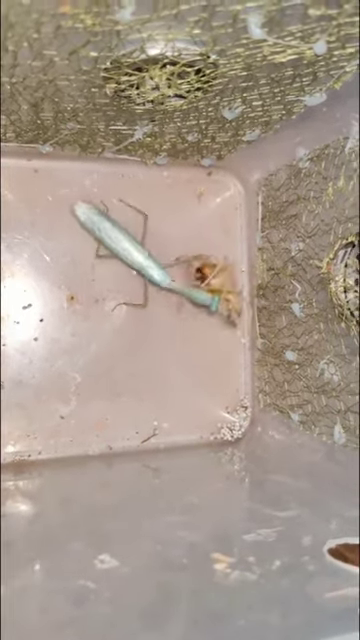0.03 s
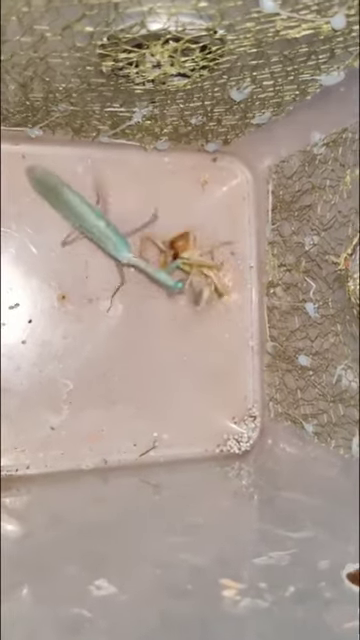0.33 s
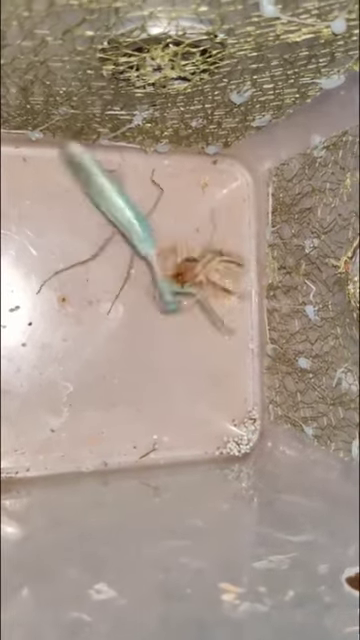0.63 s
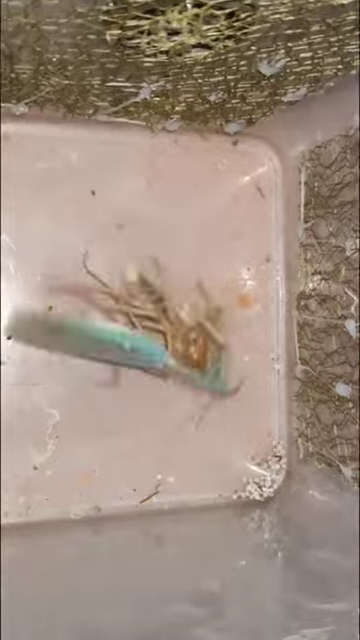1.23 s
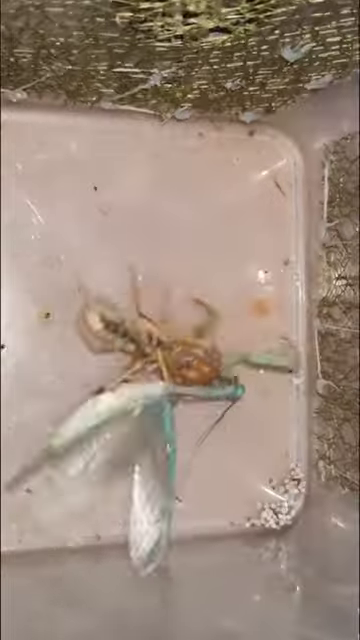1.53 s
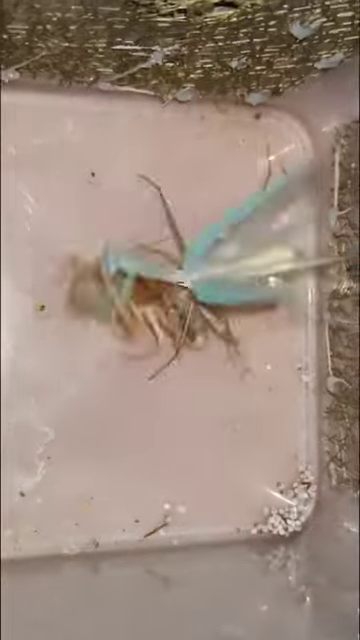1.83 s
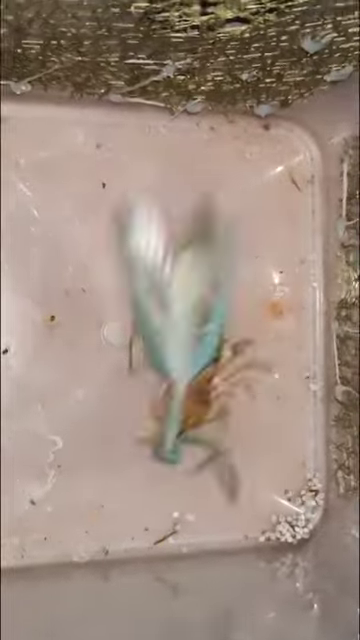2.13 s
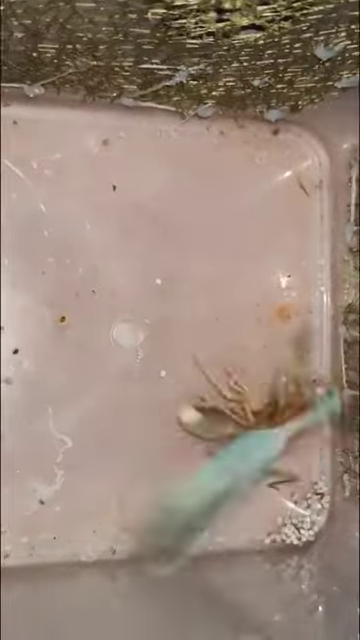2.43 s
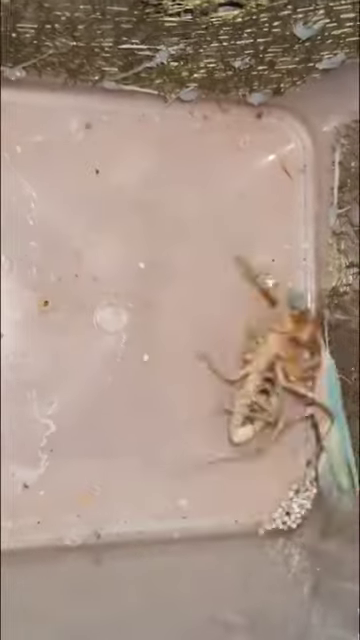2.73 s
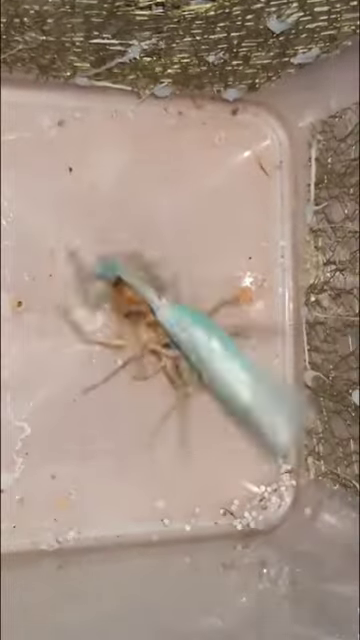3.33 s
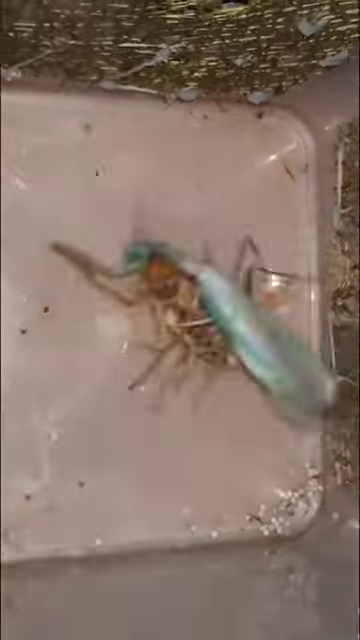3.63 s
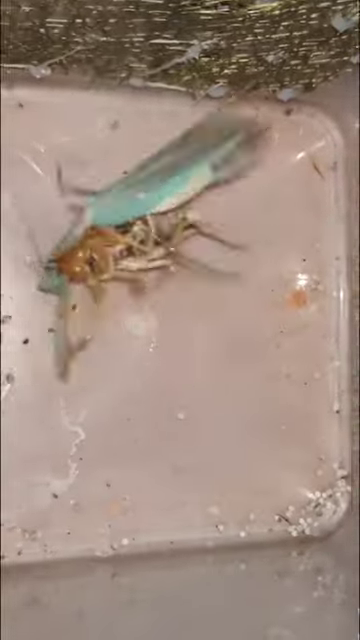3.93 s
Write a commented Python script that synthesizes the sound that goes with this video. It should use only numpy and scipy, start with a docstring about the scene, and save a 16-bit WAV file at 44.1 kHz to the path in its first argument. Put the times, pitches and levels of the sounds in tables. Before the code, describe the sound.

Insects scrabbling and knocking against a thin plastic tub, over a low hum.

```python
"""A small room, the microphone close to a thin plastic tub in which a mantis wrestles its prey.
Claws patter and scratch on the plastic, wings whisper, and dragged legs buzz as they stick and slip.
Bodies knock on the tub: the wall cracks and rings, the floor booms, hard shell ticks.
A low mains hum and soft room tone lie underneath."""
import sys
import numpy as np
from scipy import signal
from scipy.fft import rfft, irfft
from scipy.io import wavfile

SR = 44100
rng = np.random.default_rng(int(sys.argv[2]) if len(sys.argv) > 2 else 0)


def int16_out(signal):
    """Quantize to a 16-bit WAV file."""
    q = np.round(np.clip(np.atleast_2d(signal).T, -1, 1) * 32767)
    wavfile.write(sys.argv[1], SR, q.astype(np.int16))


N = 176400

# Modes of the tub's floor and wall. Each row: frequency in Hz, relative level in dB, t60 in seconds.
TUB_FLOOR = [(152.5,-7,0.051),(463.6,-4,0.03),(535,-1.5,0.024),(586.5,5.5,0.023),(649.5,-4.5,0.048),(698,-16,0.042),(1002,-7,0.04),(1138,-9.5,0.018)]
TUB_WALL = [(1470,-4,0.053),(1708,7.5,0.013),(1882,13,0.019),(1946,-0.5,0.043),(2182,3.5,0.016),(2650,-2,0.032),(2983,9,0.0082),(3282,-16.5,0.042),(4145,-14,0.038)]
RING_ATTACK_S, TICK_ATTACK_S = 0.0017, 0.0022
PATTER_PER_S, PATTER_SPREAD_DB = 350, 3
GRIT_PER_S, GRIT_SPREAD_DB = 9000, 2.6
CATCH_PER_S, BAND_FLICKER_DB = 80, 3.5
HISS_WIDTH, TOP_HZ = 0.1, 15600


def undb(db):
    """Decibels to gain."""
    return 10 ** (np.asarray(db) / 20)


def unit(x):
    """Scale to rms 1."""
    return x / np.sqrt(np.mean(x ** 2))


def burst(x):
    """Scale to the energy of 2 ms at rms 1."""
    return x / np.sqrt(np.sum(x ** 2) / (.002 * SR))


def curve(rows, column=1):
    """Gain over time from rows of seconds and dB."""
    rows = np.array(rows)
    return undb(np.interp(np.arange(N) / SR, rows[:, 0], rows[:, column]))


def colour(x, outline):
    """Minimum-phase filter that follows rows of Hz and dB."""
    size = 2 * len(x)
    hz, db = np.array(outline).T
    bin_hz = np.fft.rfftfreq(size, 1 / SR)
    gain = undb(np.interp(np.log(bin_hz + 1), np.log(hz), db))
    cepstrum = irfft(np.log(gain))
    cepstrum[1:size // 2] *= 2
    cepstrum[size // 2 + 1:] = 0
    return irfft(rfft(x, size) * np.exp(rfft(cepstrum)))[:len(x)]


def brighten(rows, db_per_octave, pivot_hz=2060):
    """Tilt rows of Hz and dB over one octave either side of a pivot."""
    rows = np.array(rows, float)
    rows[:, 1] += db_per_octave * np.clip(np.log2(rows[:, 0] / pivot_hz), -1, 1)
    return rows


def pan(x, db):
    """Place a sound, left louder by db."""
    return x * undb(np.array([[db], [-db]]) / 2)


def spread(mid, side, width):
    """Left and right from a common and an opposed part."""
    return mid + width * side * np.array([[1], [-1]])


def flicker(per_s, db):
    """A gain that wanders at random, rms 1."""
    steps = rng.standard_normal(N // 10)
    return unit(undb(db * np.interp(np.arange(N) / SR * per_s, np.arange(len(steps)), steps)))


def clicks(per_s, spread_db):
    """Random tiny contacts, mostly weak, a few strong."""
    hit = rng.random(N) < per_s / SR
    sign = rng.choice([-1, 1], N)
    strength = undb(spread_db * np.minimum(rng.exponential(size=N), 4.5))
    return unit(hit * sign * strength)


def hum_and_room_tone():
    """A slightly wavering mains hum over soft room tone; the two dip and recover together."""
    # Mains harmonics and the room tone's outline. Each row: frequency in Hz, relative level in dB.
    harmonics = [(59.7,-40),(119.4,-50.5),(240,-71)]
    air = [(20,-15.5),(31,-11),(43,11),(58,-5),(150,-1.5),(210,-12),(400,-17.5),(1100,-26.5),(2000,-24.5),(3500,-52),(16000,-52)]
    # Drift of both. Each row: time in seconds, gain in dB.
    drift = [(0,-1),(.7,-4.5),(1.1,-4),(1.6,-0.5),(2.1,1.5),(4,1.9)]
    t = np.arange(N) / SR
    hum = 0
    for hz, db in harmonics:
        waver_db = 0.43 * np.interp(t, np.linspace(0, N / SR, 40), rng.standard_normal(40))
        hum += np.sqrt(2) * undb(db + waver_db) * np.sin(2 * np.pi * (hz * t + rng.random()))
    mid, side = (unit(colour(rng.standard_normal(N), air)) for _ in range(2))
    side = signal.sosfilt(signal.butter(1, 500, "high", fs=SR, output="sos"), side)
    return (hum + undb(-52) * spread(mid, side, width=0.23)) * curve(drift)


def ring(modes, t, scatter_db=0.5, detune=0.0042):
    """One blow on the tub; each spot weights the modes differently."""
    hz, db, t60 = np.array(modes).T[:, :, None]
    weight, mistune, turn = rng.standard_normal((3, len(modes), 1))
    fade = np.exp(-np.log(1000) * t / t60)
    phase = 2 * np.pi * hz * (1 + detune * mistune) * t + 1.47 * turn
    return np.sum(undb(db + scatter_db * weight) * fade * np.sin(phase), axis=0)


def patter(modes, force, spots=8):
    """Claws catch and slip at several spots, each ringing the tub in its own way."""
    t = np.arange(SR // 8) / SR
    out = 0
    for _ in range(spots):
        spot = ring(modes, t) * np.minimum(t / RING_ATTACK_S, 1)
        contacts = force * clicks(PATTER_PER_S / spots, PATTER_SPREAD_DB)
        out += signal.fftconvolve(contacts, spot / np.linalg.norm(spot))[:N]
    return out / np.sqrt(spots)


def grit(bands=7):
    """Shell and wing rasp in fine grains; each band flares on its own, so the colour keeps shifting."""
    # Outline of the dry rasp. Each row: frequency in Hz, relative level in dB.
    rasp = [(1500,-19),(3000,11),(4200,3.5),(5100,1.5),(6000,6.5),(8200,3),(10900,-3.5),(13000,-1),(15600,-6)]
    mid, side = (unit(colour(clicks(GRIT_PER_S, GRIT_SPREAD_DB), rasp)) for _ in range(2))
    spectrum = rfft(spread(mid, side, HISS_WIDTH))
    hz = np.fft.rfftfreq(N, 1 / SR)
    centres = np.linspace(TOP_HZ / bands, TOP_HZ, bands)
    layers = (irfft(spectrum * np.interp(hz, centres, band), N) for band in np.eye(bands))
    return sum(layer * flicker(CATCH_PER_S / 2, BAND_FLICKER_DB) for layer in layers)


def scrabbling(rise_s=0.0049, fall_s=0.017):
    """Restless feet and short scrapes rattle the wall, thud on the floor and raise a gritty hiss."""
    # Unbroken footwork. Each row: time in seconds, relative levels of patter and hiss in dB.
    footwork = [(0,-66.5,-82),(.35,-58.5,-67.5),(.53,-64,-71),(.92,-56,-58),(1.15,-53,-59),(1.41,-58.5,-57.5),(1.65,-47.5,-48),(1.85,-54,-55),(2.02,-60.5,-60),(2.24,-88,-56.5),(2.5,-60,-52),(2.68,-71,-52),(2.84,-69,-52),(3.25,-51,-43.5),(3.55,-62.5,-52.5),(4,-56.5,-57.5)]
    # Scrapes of legs and wings. Each row: start and length in seconds, then relative levels
    # of wall rattle, floor boom and hiss in dB.
    scrapes = [(0.572,0.17,-52.5,-72,-77),(1.058,0.037,-69,-79,-60.5),(1.204,0.032,-67,-58.5,-57.5),(1.274,0.023,-50.5,-61,-65),
               (1.344,0.027,-54,-47.5,-63),(1.498,0.028,-36,-51,-54),(1.726,0.035,-46,-54.5,-67),
               (1.94,0.016,-51,-55,-58),(2.086,0.012,-39.5,-41.5,-54),(2.285,0.045,-44,-51.5,-60),
               (2.357,0.057,-45.5,-57,-63),(2.56,0.013,-41.5,-44.5,-60),(2.636,0.011,-51.5,-49,-52),(2.722,0.057,-42,-51.5,-57.5),
               (2.881,0.051,-52,-53.5,-55.5),(2.97,0.038,-48,-53.5,-53),(3.053,0.073,-48.5,-73,-55.5),(3.124,0.075,-44,-60,-60.5),
               (3.199,0.018,-52,-50,-54),(3.423,0.047,-48,-46,-57),(3.57,0.047,-40.5,-51,-62.5),(3.679,0.043,-69,-47,-77),
               (3.746,0.041,-42.5,-44,-62),(3.883,0.021,-44,-43,-56),(3.925,0.004,-49,-38,-68)]
    # Outline of claws scratching the wall. Each row: frequency in Hz, relative level in dB.
    claw_colour = [(800,-9),(2500,-2.5),(4000,-11.5),(5200,-25),(8000,-45)]
    t = np.arange(N) / SR
    wall, boom, hiss = np.zeros((3, N))
    for start, length, wall_db, boom_db, hiss_db in scrapes:
        stroke = np.clip((t - start) / rise_s, 0, 1) * np.exp(-np.maximum(t - start - length, 0) / fall_s)
        wall += stroke * undb(wall_db - 5.5)
        boom += stroke * undb(boom_db - 5.5)
        hiss += stroke * undb(hiss_db - 1)
    feet, feet_hiss = curve(footwork), curve(footwork, column=2)
    catch = flicker(CATCH_PER_S, db=2.5)  # claws grip and let go
    drag = np.sqrt(catch) * np.hypot(wall, feet * undb(-7))
    scratch = unit(colour(clicks(PATTER_PER_S, PATTER_SPREAD_DB), claw_colour))
    rattle = patter(TUB_WALL, drag) + undb(-7) * drag * scratch
    thud = patter(TUB_FLOOR, np.hypot(boom, feet * undb(-19.5)))
    rasp = grit() * catch * np.hypot(hiss, feet_hiss * undb(-16))
    return pan(rattle + thud, db=2) + rasp


def rub(levels, hz, width_hz):
    """Fine stick-slip grains in one resonance, coming in uneven strokes."""
    band = signal.butter(2, [hz - width_hz / 2, hz + width_hz / 2], "band", fs=SR, output="sos")
    mid, side = (unit(signal.sosfilt(band, clicks(GRIT_PER_S, GRIT_SPREAD_DB))) for _ in range(2))
    return spread(mid, side, HISS_WIDTH) * flicker(CATCH_PER_S, BAND_FLICKER_DB) * curve(levels)


def wing_whisper():
    """Wings rub with a high, airy whisper."""
    # Course of the whisper. Each row: time in seconds, level in dB.
    levels = [(.1,-104),(0.299,-86),(.5,-92),(.72,-80),(1.02,-76),(1.08,-60),(1.15,-74),(1.23,-68),(1.4,-79),(1.9,-73),(2.1,-104),(3.13,-73),(3.5,-86)]
    return rub(levels, hz=13200, width_hz=1800)


def leg_buzz():
    """Legs dragged over the plastic give a dry buzz."""
    # Course of the buzz. Each row: time in seconds, level in dB.
    levels = [(.25,-96.5),(.38,-66),(.52,-87),(.6,-81),(.82,-62.5),(1,-81),(1.14,-60.5),(1.45,-81.5)]
    return rub(levels, hz=2683, width_hz=610)


def snap(t, outline, peak_s, decay_s, swell_s=0.0022):
    """A contact: a crackle that swells and dies within milliseconds."""
    shape = np.exp(np.minimum((t - peak_s) / swell_s, (peak_s - t) / decay_s))
    return burst(colour(rng.choice([-1, 1], len(t)) * shape, outline))


def body_knocks(floor_attack_s=0.0016, usual_tick_db=-31):
    """A body hits the tub: the wall cracks and rings, the floor booms and hard shell ticks."""
    # Knocks. Each row: start in seconds, relative level in dB, floor boom in dB,
    # tilt of that boom in dB per octave, shell tick in dB. Boom and tick are relative to the knock.
    knocks = [(0.555,-43.5,-16,-11,-31),(0.5784,-45.5,-1.5,10,-35),(0.5851,-40,-31,0,-29),(0.6614,-41.5,-18,4,-31),
              (1.1315,-37.5,-45,0,-21),(1.217,-29,-22,-9,-46),(1.3334,-34.5,-27,2,-19.5),(1.4246,-38,-18,8,-9.5),
              (1.4905,-11.5,-13.5,-1.5,-26),(1.606,-32,-12.5,7,-23),(1.7435,-27,-16,0,-16.5),
              (1.7881,-24.5,-18,15,-26.5),(1.958,-40,-27,-9,-12.5),(2.0373,-35.5,-16,0,-13.5),(2.0843,-23.5,-17,-1,-34),
              (2.0941,-24,-22,0,-14),(2.3252,-11.5,-10.5,2.5,-20),(2.524,-36,-16,2,-21),(2.5584,-22,-6.5,-11,-13),
              (2.6005,-30,-18.5,2,-15.5),(2.7117,-32.5,-14,-5,-15.5),(2.7295,-25,-12,-2.5,-27.5),(2.8989,-30.5,-39,-4,-42),
              (3.2014,-32,-16,-9,-63),(3.3318,-28,-26,5,-21),(3.5986,-34,-24,0,-20),(3.6862,-25,-13.5,-8,-39),
              (3.6956,-25,-14,0,-58),(3.7697,-33.5,-16,7,-48),(3.8031,-31,-5.5,-4,-63),(3.8989,-31,-8,2,-66)]
    # Outlines of the wall's crack and the shell's tick. Each row: frequency in Hz, relative level in dB.
    crack_colour = [(700,-28),(1200,-18),(1700,6),(2400,-2),(3150,-3),(4100,-20.5),(5000,-31.5),(9000,-37.5)]
    tick_colour = [(2500,-29),(4200,-9),(5100,4),(5900,11),(8000,9),(10500,-6.5),(13000,-19),(16000,-26)]
    t = np.arange(SR // 8) / SR
    out = np.zeros((2, N + len(t)))
    for start, db, boom_db, boom_tilt, tick_db in knocks:
        wall_tilt = 0.53 * (tick_db - usual_tick_db)  # harder contacts tick more and crack brighter
        rung = burst(ring(brighten(TUB_WALL, wall_tilt), t) * np.minimum(t / RING_ATTACK_S, 1) ** 2)
        crack = snap(t, brighten(crack_colour, wall_tilt), RING_ATTACK_S, decay_s=0.0015)
        wall = pan(burst(rung + crack), db=2)
        floor = ring(brighten(TUB_FLOOR, boom_tilt, pivot_hz=600), t)
        boom = pan(burst(floor * np.minimum(t / floor_attack_s, 1)), db=1.5)
        mid, side = (snap(t, tick_colour, TICK_ATTACK_S, decay_s=0.0031) for _ in range(2))
        tick = spread(mid, side, HISS_WIDTH)
        knock = undb(-5.5) * wall + undb(boom_db + 1) * boom + undb(tick_db - 4) * tick
        i = int(start * SR)
        out[:, i:i + len(t)] += undb(db) * knock
    return out[:, :N]


def claw_skids(db_per_octave=11.5):
    """A claw catches and skids: a sharp start, a short gritty tail, each in its own colour."""
    # Single skids. Each row: start in seconds, level in dB, centre of the colour in Hz.
    skids = [(1.014,-56.5,13300),(2.896,-55,7100),(2.933,-56,5370),(2.981,-49.5,4660),(3.055,-75,5900),
             (3.148,-47,8400),(3.213,-50,11000),(3.331,-42,13000),(3.418,-46.5,8800)]
    t = np.arange(SR // 8) / SR
    out = np.zeros((2, N + len(t)))
    for start, db, hz in skids:
        outline = [(hz * 2. ** octave, -db_per_octave * abs(octave)) for octave in range(-4, 2)]
        mid, side = (snap(t, outline, TICK_ATTACK_S, decay_s=0.0041) for _ in range(2))
        i = int(start * SR)
        out[:, i:i + len(t)] += undb(db) * spread(mid, side, HISS_WIDTH)
    return out[:, :N]


def echo(x, t60_s, onset_s):
    """Dense reflections that build up and die away; their bass is alike left and right."""
    t = np.arange(SR // 2) / SR
    envelope = np.exp(-np.log(1000) * t / t60_s) * np.minimum(t / onset_s, 1)
    mid, side = rng.standard_normal((2, len(t))) * envelope
    side = colour(side, [(150, -31), (600, 8.0), (2000, 7.5), (6000, 9.5)])
    response = spread(mid, side, width=0.32) / np.linalg.norm(mid)
    return signal.fftconvolve(x, response, axes=1)[:, :N]


def tub_and_room(x, split_hz=4500):
    """The close microphone hears the direct sound, quick reflections in the tub and a little room."""
    low = signal.sosfilt(signal.butter(2, split_hz, fs=SR, output="sos"), x)
    high = signal.sosfilt(signal.butter(2, split_hz, "high", fs=SR, output="sos"), x)
    room = echo(low, t60_s=0.37, onset_s=0.011) + echo(high, t60_s=0.34, onset_s=0.011)
    tub = echo(x, t60_s=0.04, onset_s=0.00023)
    return x + undb(-6.5) * tub + undb(-13.5) * room


def scene():
    """The struggle in its tub, close up, over the hum of the room."""
    struggle = leg_buzz() + wing_whisper() + body_knocks() + scrabbling() + claw_skids()
    return tub_and_room(struggle) + hum_and_room_tone()


def record(dry):
    """The recorder cuts the treble steeply above TOP_HZ."""
    return signal.sosfilt(signal.ellip(10, .2, 80, TOP_HZ, fs=SR, output="sos"), dry)


dry = scene()
out = record(dry)
int16_out(out)
```